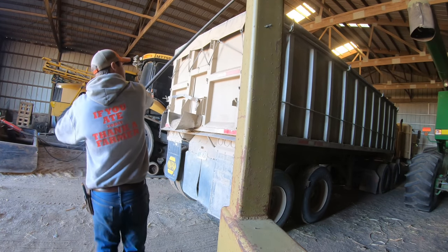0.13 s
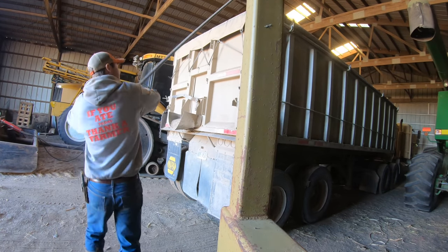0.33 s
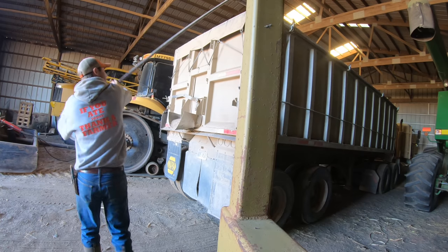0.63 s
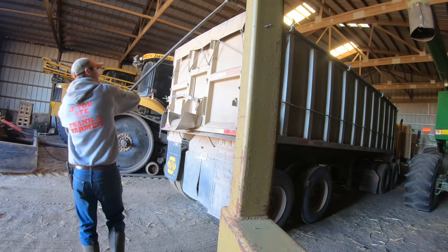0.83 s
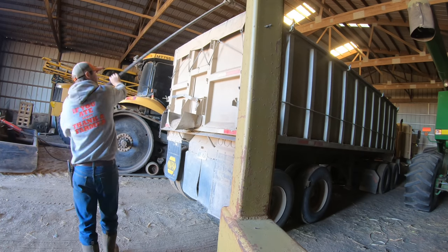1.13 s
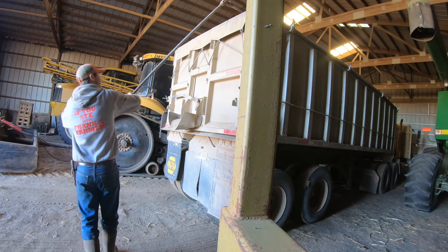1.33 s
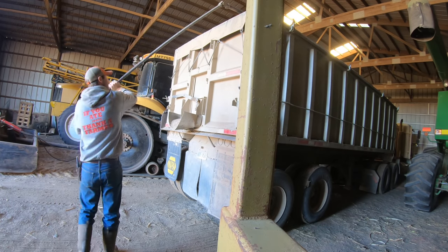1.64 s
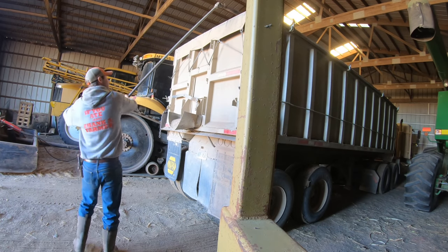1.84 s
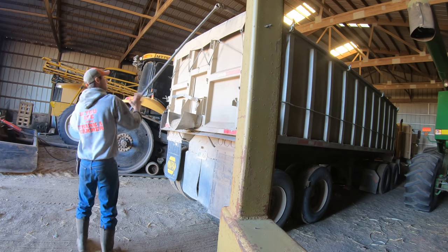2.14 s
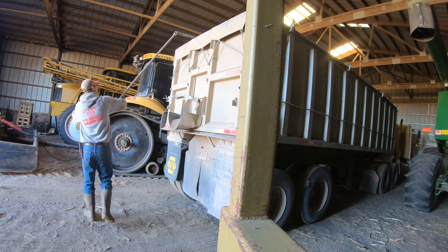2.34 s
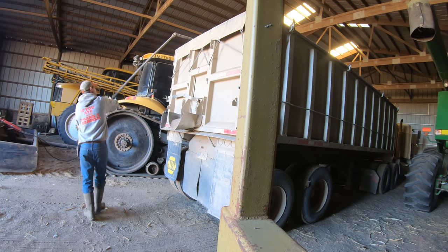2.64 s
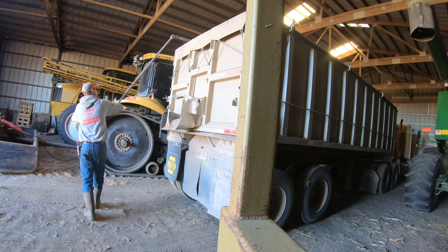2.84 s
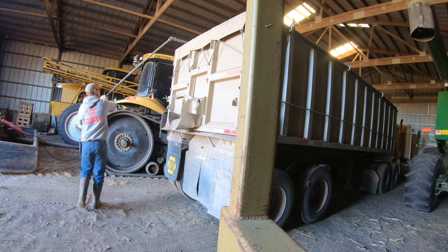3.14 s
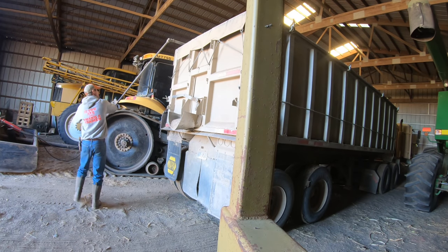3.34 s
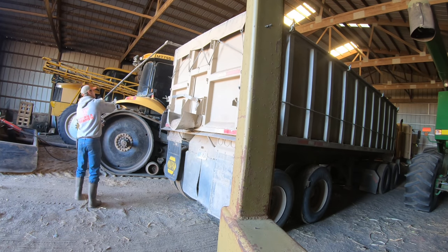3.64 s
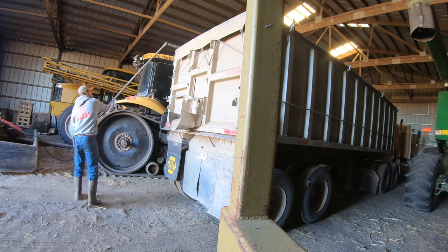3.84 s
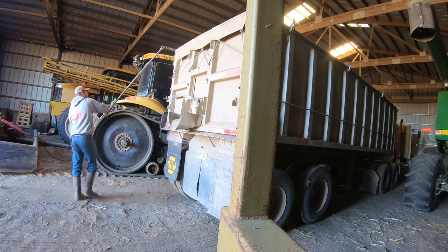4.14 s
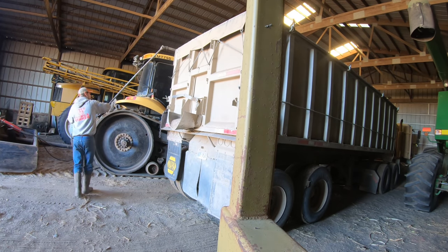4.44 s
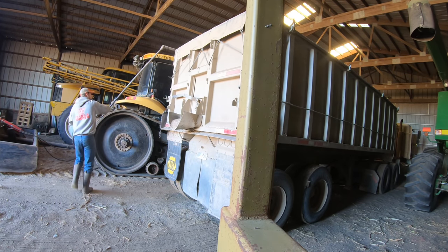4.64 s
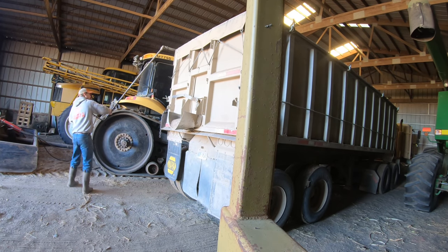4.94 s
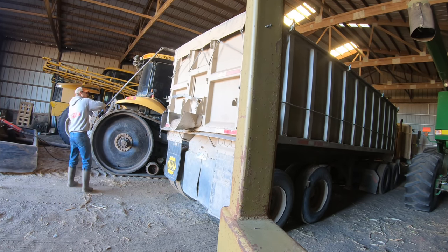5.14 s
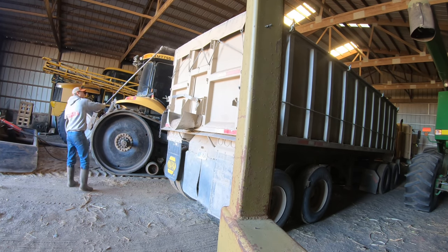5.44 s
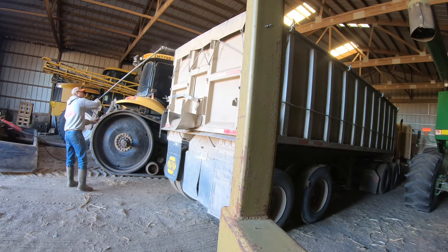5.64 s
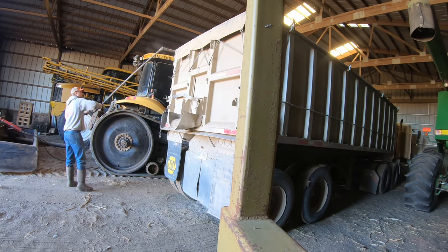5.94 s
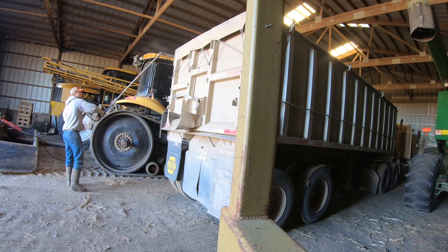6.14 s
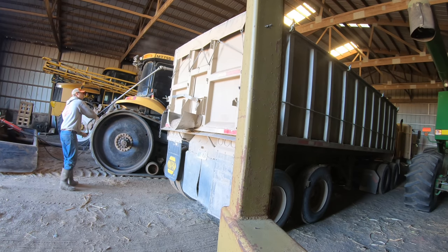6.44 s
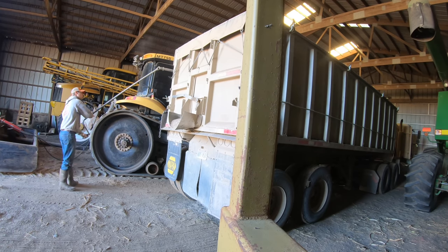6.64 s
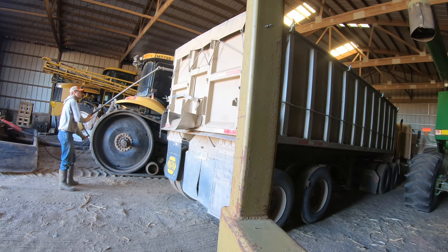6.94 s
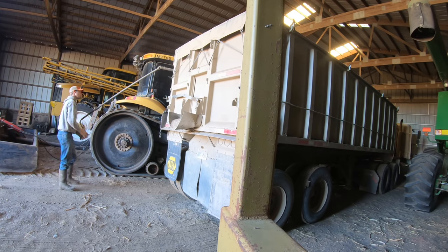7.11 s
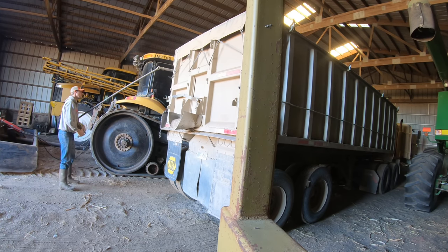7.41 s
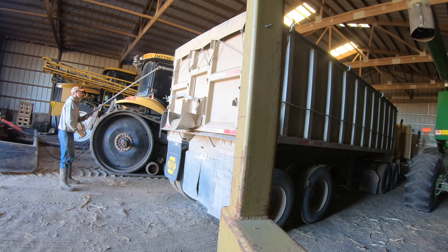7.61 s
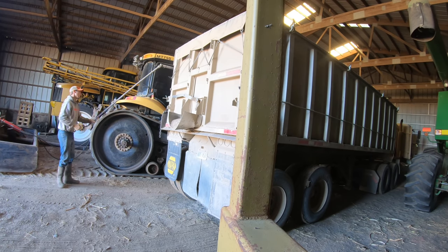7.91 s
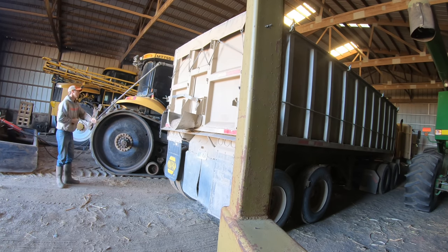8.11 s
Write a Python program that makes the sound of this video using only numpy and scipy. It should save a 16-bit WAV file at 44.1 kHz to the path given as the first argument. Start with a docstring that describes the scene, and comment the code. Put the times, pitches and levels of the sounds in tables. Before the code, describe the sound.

Inside a large farm shed, a long steel crank is worked close to the microphone. Irregular pushes bring sharp clanks, dry chattering, rasping and short thin squeaks, with the rod ringing briefly. A stiff tarp rustles farther up and bumps the hollow trailer. Knocks thin out midway, then the tarp slides over with a cluster of slaps and dull thuds, before sparse final clinks. Everything echoes for about a second.

```python
"""A long steel crank rolls a tarp over a grain trailer in a large farm shed.
Its dry joints chatter, rasp and squeak in swarms of tiny slips, and the loose rod clanks and rings in its modes.
The tarp rustles as crackling fabric, slaps and bumps the hollow trailer body, and finally slides over the edge.
The shed answers everything with about a second of decaying noise as echo; faint air lies underneath."""
import sys
import numpy as np
from scipy import signal
from scipy.fft import rfft, irfft, next_fast_len
from scipy.io import wavfile

SR = 44100
rng = np.random.default_rng(int(sys.argv[2]) if len(sys.argv) > 2 else 0)


def store_wav(level_fs):
    """Save 16-bit WAV to argv[1]."""
    pcm = np.round(np.clip(np.atleast_2d(level_fs), -1, 1) * 32767)
    wavfile.write(sys.argv[1], SR, pcm.T.astype(np.int16))


N = 364707
TIME = np.arange(N) / SR
TOP_HZ = 15100  # upper limit of the sound

# Levels in the tables are ahead of the layer trims and of the mix in scene().
# Spectrum of scraping steel. Each row: frequency in Hz, level in dB.
STEEL_SCRAPE = [(700, -19), (1200, 6), (1600, 10.5), (2300, 11.5), (3200, 12.5), (4800, 6.5), (6200, 12),
                (7500, 0), (9200, 7), (10500, -6.5), (11800, -54), (15000, -16)]
# Modes of the crank rod when slack. Each row: frequency in Hz, level in dB, t60 in seconds.
ROD_MODES = [(1670, -14, .5), (1830, -10, .3), (1915, -2, .8), (2240, -3, .75), (2400, -7, .15),
             (2830, -8, .2), (3310, -6, .6), (3470, -5, .55), (4000, -10, .25), (4600, -11, .15),
             (4893, -9, .4), (5593, -6, .32), (6020, -7, .3), (6850, -10, .2)]
# How unlike the two ears are. Each row: frequency in Hz, side gain in dB.
EAR_WIDTH = [(40, -8), (140, -17), (280, -16), (550, -5.5), (1000, 1), (2000, -3), (4000, -5.5),
             (9000, 5.5)]


def undb(db):
    """Decibels to gain."""
    return 10 ** (np.asarray(db) / 20)


def unit(x):
    """Scale to rms 1."""
    return x / np.sqrt(np.mean(x ** 2))


def along(points, hz):
    """Read (Hz, value) points on a log-frequency axis."""
    f, value = np.transpose(points)
    return np.interp(np.log(hz + 1), np.log(f), value)


def filtered(x, response):
    """Filter by a gain that is a function of frequency."""
    length = x.shape[-1]
    size = next_fast_len(length + 2048)
    hz = np.arange(size // 2 + 1) * SR / size
    return irfft(rfft(x, size) * response(hz), size)[..., :length]


def colour(x, points):
    """Filter by a (Hz, dB) spectrum."""
    return filtered(x, lambda f: undb(along(points, f)))


def resonance(f, hz, width):
    """Response of one damped resonance, 1 at its centre."""
    return 1j * f * width / (hz ** 2 - f ** 2 + 1j * f * width)


def walk(rate):
    """Random wandering line with a spread near 1, through `rate` points a second until 4096 are used."""
    knots = rng.standard_normal(4096)
    return 1.51 * np.interp(TIME * rate, np.arange(len(knots)), knots)


def clicks(rate, spread_db):
    """Tiny contacts at random times, `rate` a second; spread_db widens their range of strength."""
    size = undb(spread_db * np.minimum(rng.exponential(size=N), 4))
    return (rng.random(N) < rate / SR) * size * rng.standard_normal(N)


def add(track, s, sound):
    """Mix a sound in at time s."""
    start = max(int(s * SR), 0)
    part = sound[:max(N - start, 0)]
    track[start:start + len(part)] += part


def envelope(s, length, attack, sag, release):
    """Smooth rise around time s, a hold that sags, then a further release; both falls in dB per second."""
    age = np.maximum(TIME - s, 0)
    rise = .5 + .5 * np.tanh(2 * (TIME - s) / attack)
    return rise * undb(-sag * age - release * np.maximum(age - length, 0))


def chirps(pitch, rate, scatter, length, spread_db):
    """A swarm of tiny squeals, each a few milliseconds of slip gliding somewhere around the given pitch."""
    out = np.zeros(N)
    times = rng.uniform(0, N - 1, 9000)
    draws = rng.standard_normal((len(times), 4))
    for at, (detune, glide, size, span) in zip(times[:int(rate * N / SR)], draws):
        count = int(SR * length * np.exp(0.51 * span)) + 2
        u = np.arange(count) / count
        hz = min(pitch[int(at)] * np.exp(scatter * detune), TOP_HZ)
        tone = np.sin(2 * np.pi * hz * count / SR * (u + 0.02 * glide * u ** 2))
        swell = np.minimum(u / .15, 1) * (1 - u)
        add(out, at / SR, undb(spread_db * size) * tone * swell)
    return unit(out)


def air():
    """Faint outdoor rumble drifting in through the open door: coloured noise whose level wanders."""
    # Spectrum of the air. Each row: frequency in Hz, level in dB.
    air_spectrum = [(20, -11), (60, -78), (160, 2.5), (400, -9), (1000, -14), (3000, -11.5), (5500, -15.5),
                    (9000, -22), (12000, -63)]
    noise = unit(colour(rng.standard_normal((2, N)), air_spectrum))
    mid, side = noise * undb(-52.0 + walk(1.47))
    return mid + colour(side, EAR_WIDTH) * np.array([[1], [-1]])


def shed(x, echo_db, early_db):
    """Direct sound, quick reflections off trailer and floor, then the long echo of the roof and walls."""
    # Decay of the echo. Each row: frequency in Hz, t60 in seconds.
    echo_t60 = [(100, 0.74), (500, 1.31), (2000, 1.26), (4000, 0.73), (8000, 0.46), (14000, 0.48)]
    t = TIME[:SR]
    centres = np.geomspace(60, 15000, 9)
    noise, tail = rng.standard_normal((2, SR)), 0
    # overlapping bands of noise, each dying away at its own pace
    for hz, share in zip(centres, np.eye(len(centres))):
        band = filtered(noise, lambda f: along(np.column_stack([centres, share]), f))
        tail = tail + band * undb(-60 * t / along(echo_t60, hz))
    tail = tail * np.clip(t / 0.029, 0, 1)
    # sparse reflections
    early = rng.standard_normal((2, SR)) * (rng.random(SR) < .04) * (t > .002) * np.exp(-t / .02)
    response = (undb(echo_db) * unit(tail) + undb(early_db) * unit(early)) / np.sqrt(SR)
    source = np.atleast_2d(x).mean(axis=0, keepdims=True)
    mid, side = signal.fftconvolve(source, response, axes=1)[:, :N]
    return x + mid + colour(side, EAR_WIDTH) * np.array([[1], [-1]])


def tarp():
    """Creasing fabric crackles in uneven folds while the roll drums softly on the trailer: rolling, then tugs."""
    # Stiff fabric. Each row: frequency in Hz, level in dB.
    fabric_spectrum = [(30, -9), (120, -9.5), (330, 3), (600, -1), (1100, -2.5), (2000, -2.5), (4000, -16),
                       (8000, -34), (12000, -50)]
    # Hollow trailer body. Each row: frequency in Hz, level in dB.
    body_spectrum = [(20, -35), (55, -11), (90, -13), (140, -2.5), (230, -3.5), (330, -10.5), (600, -35),
                     (1500, -67)]
    # Tarp rolling across the top of the trailer. Each row: time in seconds, rustle level in dB.
    rolling_level = [(0.0, -41.5), (0.46, -78), (0.51, -50.5), (0.96, -59), (2.36, -53), (2.72, -44),
                     (3.2, -48), (3.57, -38.5), (3.9, -57), (4.21, -43), (4.5, -61.5)]
    # Tarp tugged along and over the edge. Each row: start in seconds, length in seconds, rustle level in dB,
    # drumming of the body in dB relative to the rustle.
    tugs = [(4.63, 0.083, -36.5, -6.5), (5.083, 0.13, -40, 6.5), (5.541, 0.036, -32.5, -2.5),
            (5.714, 0.87, -40.5, 1), (6.43, 0.26, -27.5, -1.5), (6.614, 0.16, -26, 2),
            (6.79, 0.08, -31, -1), (7.637, 0.067, -48, 12), (8.082, .11, -41.5, -22),
            (8.241, 0.054, -25.5, -25)]
    rolling_db, drum_over_rustle_db = 3.5, 3
    fade_start_s, fade_db_per_s = 5.3, 9  # the faint rolling fades away
    tug_attack_s, tug_release_db_per_s = 0.092, 69  # each tug swells, holds and dies away

    fade_db = fade_db_per_s * np.maximum(TIME - fade_start_s, 0)
    rustling = undb(rolling_db + np.interp(TIME, *np.transpose(rolling_level)) - fade_db)
    drumming = undb(drum_over_rustle_db) * rustling
    for s, length, db, drum_db in tugs:
        tug = undb(db) * envelope(s, length, tug_attack_s, 0, tug_release_db_per_s)
        rustling = np.maximum(rustling, tug)
        drumming = np.maximum(drumming, undb(drum_db) * tug)
    crackle = colour(clicks(rate=2000, spread_db=1), fabric_spectrum)
    rustle = unit(crackle * undb(1.3 * walk(40)))
    drum = unit(colour(clicks(rate=1200, spread_db=0.0), body_spectrum))
    return undb(0.5) * rustling * rustle + undb(-4.0) * drumming * drum


def slaps():
    """Heavy fabric lands flat on the trailer: a short dull smack of noise with no pitch."""
    # Folds of tarp and straps slapping. Each row: start in seconds, peak level in dB, t60 in seconds.
    slap_events = [(3.502, -27.5, 0.13), (6.514, -18, .08), (6.597, -20.5, 0.16), (6.648, -17.5, 0.11),
                   (6.663, -14.5, 0.11), (6.735, -32, 0.19), (6.837, -18.5, 0.054), (6.877, -18.5, 0.096),
                   (7.625, -35, 1), (8.226, -21, 0.39)]
    # Colour of a slap. Each row: frequency in Hz, level in dB.
    slap_spectrum = [(50, -39), (150, -7), (330, 1), (700, 0.5), (1100, -3.5), (2000, -16), (4000, -37),
                     (10000, -62)]
    attack_s = .003
    out, t = np.zeros(N), TIME[:SR // 2]
    for s, db, t60 in slap_events:
        burst = rng.standard_normal(len(t)) * undb(-60 * t / t60)
        smack = colour(burst, slap_spectrum) * np.minimum(t / attack_s, 1)
        add(out, s, undb(db) * smack / np.abs(smack).max())
    return out


def bumps(count=7):
    """Dull blows on the body: a handful of panel modes around one pitch die away together over a soft rumble."""
    # Roll tube bumping on the body. Each row: start in seconds, peak level in dB, pitch in Hz, t60 in seconds.
    bump_events = [(0.501, -23, 148, 0.13), (0.598, -13.5, 195.5, 0.082), (0.628, -19, 127.6, 0.18),
                   (0.975, -27.5, 160.4, 0.35), (1.78, -37, 104, 1), (2.307, -28.5, 182.5, 0.42),
                   (2.442, -25.5, 148.6, 0.14), (2.572, -24.5, 175, 0.077), (2.776, -28.5, 156, 0.99),
                   (3.12, -19.5, 129, 0.073), (3.273, -23, 121.8, 0.92), (3.498, -15.5, 115, 0.26),
                   (3.508, -19.5, 278.3, 1), (3.52, -34, 42, 0.37), (5.175, -29.5, 136.4, 0.6),
                   (6.641, -14, 145, 0.099), (6.66, -22, 41.6, 0.19), (6.691, -17, 104, 0.11),
                   (6.734, -24, 128.4, 0.18), (6.905, -21.5, 173, 0.074), (7.63, -36, 189.3, 1),
                   (8.225, -18, 299, 0.35)]
    attack_s = .003  # the tarp cushions the tube
    out, t = np.zeros(N), TIME[:SR // 2]
    for s, db, hz, t60 in bump_events:
        detune = np.linspace(-.45, .45, count) + 0.0632 * rng.standard_normal(count)
        mode_hz = hz * np.exp(detune)
        panels = np.sin(2 * np.pi * (mode_hz[:, None] * t + rng.random((count, 1)))).sum(axis=0)
        rumble = 13 * rng.standard_normal(len(t))
        struck = (panels + rumble) * undb(-60 * t / t60) * np.minimum(t / attack_s, 1)
        # the body resonates around the pitch and passes little far above it
        boom = filtered(struck, lambda f: resonance(f, hz, .7 * hz) ** 2 / (1 + 1j * f / (2.4 * hz)) ** 3)
        add(out, s, undb(db - 2.0) * boom / np.abs(boom).max())
    return out


def rings():
    """When the load comes off, the rod's modes sing on as clear separate tones."""
    # Slack rod left ringing after a knock. Each row: start in seconds, level in dB, pitch that rings most in Hz,
    # width of the excited range in Hz.
    ring_events = [(0.885, -17, 3330, 200), (3.07, -25, 3280, 160), (5.152, -19.5, 3460, 330),
                   (7.456, -29.5, 2080, 1300), (8.154, -20, 2220, 160)]
    out, t = np.zeros(N), TIME[:SR]
    mode_hz, mode_db, t60 = np.transpose(ROD_MODES)[:, :, None]
    for s, db, hz, width in ring_events:
        excited = np.abs(resonance(mode_hz, hz, width))
        modes = excited * undb(mode_db - 60 * t / t60) * np.sin(2 * np.pi * mode_hz * t)
        add(out, s, undb(db) * modes.sum(axis=0))
    return out


def clanks():
    """Each knock bounces at random; the contacts crack and ring the rod's modes, one pitch most at each spot."""
    # Rod knocking in its joints. Each row: start in seconds, peak level in dB, pitch that rings most in Hz,
    # time the rattling lasts in seconds, crack of the contact in dB relative to the ringing.
    knocks = [(0.026, -7.5, 2910, 0.0077, 22), (0.231, -5, 2870, 0.0076, 12), (0.399, -16, 3147, 0.034, -3),
              (0.632, -20, 1790, 0.02, 18), (0.773, -14, 3100, 0.057, 21), (0.819, -6.5, 5830, 0.024, 30),
              (1.279, -11, 3760, 0.023, 19), (1.345, -7, 4530, 0.05, 20), (1.774, -11, 6130, 0.024, 12),
              (1.963, -9.5, 2897, 0.053, 8), (2.278, -11, 2014, 0.034, 12), (2.744, -13.5, 4640, 0.029, 63),
              (3.068, -7, 3097, 0.0048, 9), (3.936, -12, 5880, 0.045, 11), (3.999, -7, 2980, 0.0085, 33),
              (4.216, -21, 4370, 0.023, 15), (4.472, -17, 3360, 0.016, 25), (4.599, -17.5, 3237, 0.093, 13),
              (4.704, -15, 3030, 0.021, 8), (4.906, -18.5, 2424, 0.019, 14), (5.036, -11, 4000, 0.014, 24),
              (5.076, -14, 2450, 0.069, 13.5), (5.148, -12.5, 3290, 0.044, -2),
              (5.486, -10, 2235, 0.055, 14), (5.591, -7.5, 6550, 0.0077, 36), (5.77, -12, 2250, 0.0042, 24),
              (6.427, -10.5, 3760, 0.084, 28), (6.466, -8.5, 4550, 0.024, 18.5),
              (6.609, -10, 3480, 0.027, 26), (6.827, -12, 6500, 0.0094, 43), (6.867, -15, 3710, 0.014, 27),
              (7.455, -19, 2255, 0.019, 11), (8.039, -20, 3317, 0.0046, 10), (8.153, -10, 2290, 0.0074, 22)]
    grip_damping = 2.6  # a rod under load dies away this many times faster than a slack one
    first_contact = 1  # strength of the first touch relative to the strongest possible bounce
    spot_db, spot_t60_s, spot_spread = 9, 0.07, .035  # close modes that ring at the struck spot
    out, t = np.zeros((2, N)), TIME[:SR // 2]
    mode_hz, mode_db, t60 = np.transpose(ROD_MODES)[:, :, None]
    for s, db, hz, length, crack_db in knocks:
        # the changing load on the rod detunes its modes a little
        load = 1 + .006 * rng.standard_normal(mode_hz.shape)
        modes = undb(mode_db - 60 * grip_damping * t / t60) * np.sin(2 * np.pi * mode_hz * load * t)
        contacts = rng.random(len(t)) < 400 / SR
        bounces = contacts * rng.uniform(-1, 1, len(t)) * np.exp(-(t / length) ** 2)
        bounces[0] = first_contact
        spot_hz = hz * (1 + spot_spread * rng.standard_normal((3, 1)))
        spot = np.sin(2 * np.pi * spot_hz * t).sum(axis=0) * undb(spot_db - 60 * t / spot_t60_s)
        for ear in out:
            crack = colour(rng.standard_normal(len(t)) * undb(-60 * t / .04), STEEL_SCRAPE)
            # each mode radiates its own way, so the two sides hear a different blend
            blend = undb(2 * rng.standard_normal(len(ROD_MODES))) @ modes
            steel = (blend + spot + undb(crack_db) * crack) * np.minimum(t / .003, 1)
            rattle = signal.fftconvolve(bounces, steel)[:len(t)]
            knock = filtered(rattle, lambda f: resonance(f, hz, 0.9 * hz))
            add(ear, s, undb(db - 2.0) * knock / np.abs(knock).max())
    return out


def squeaks(waver=.012, flutter_db=2.5):
    """Short gliding stick-slip tones with overtones; pitch and strength tremble as the grip changes."""
    # Dry joint sticking and slipping. Each row: start in seconds, length in seconds, start pitch in Hz,
    # end pitch in Hz, level in dB.
    glides = [(0.098, 0.032, 3850, 3600, -25), (0.113, 0.056, 1764, 1864, -21),
              (0.117, 0.051, 5300, 5580, -28), (0.168, 0.027, 4020, 4060, -23),
              (0.214, 0.02, 4680, 4470, -34), (0.216, 0.078, 1900, 1980, -33), (.243, .03, 2930, 2900, -34),
              (.255, .05, 5460, 5540, -34), (.328, 0.026, 2830, 2900, -26.5), (.33, 0.043, 1990, 1916, -30),
              (.37, 0.013, 5980, 5840, -22), (0.449, 0.043, 1890, 1906, -26),
              (0.404, 0.04, 3200, 3280, -20), (0.467, 0.042, 3300, 3330, -24),
              (0.638, 0.014, 2084, 1838, -23), (0.663, 0.023, 3426, 3734, -13.5),
              (0.689, 0.029, 3910, 4040, -19.5), (0.715, 0.017, 4400, 4540, -27),
              (0.731, 0.049, 1810, 1984, -22.5), (.735, 0.043, 3650, 4030, -22),
              (.73, 0.064, 5750, 5970, -25.5), (0.9, 0.07, 11300, 10850, -50),
              (0.976, 0.041, 1920, 1870, -24), (1.203, 0.017, 4660, 3880, -26.5),
              (1.219, 0.019, 3460, 3520, -15), (1.236, 0.041, 3520, 3720, -23),
              (1.231, 0.048, 7050, 7400, -29.5), (1.297, 0.03, 1847, 1915, -21.5),
              (1.425, 0.025, 1912, 2034, -18), (1.703, 0.066, 1750, 1622, -29),
              (1.769, .012, 4070, 3900, -24.5), (1.781, 0.013, 3520, 3380, -20.5),
              (1.801, 0.027, 3460, 3390, -17), (1.809, 0.032, 5710, 5790, -25.5),
              (1.826, 0.033, 3570, 3980, -24), (1.803, 0.075, 1910, 2010, -26.5),
              (2.267, 0.064, 1977, 1812, -22), (2.266, .018, 3780, 3820, -24.5),
              (2.335, 0.04, 6700, 7500, -34), (2.763, 0.017, 3370, 3336, -13),
              (2.785, 0.1, 1872, 1820, -25), (3.285, 0.12, 1750, 1864, -24.5),
              (3.385, 0.22, 1915, 1847, -24), (3.838, 0.023, 1750, 1704, -26.5),
              (4.01, 0.031, 1968, 1930, -17), (4.57, 0.018, 2315, 2430, -23), (4.92, 0.03, 4890, 4920, -36),
              (5.029, 0.0213, 2242, 2630, -16), (5.069, 0.052, 2580, 1916, -24),
              (5.152, 0.086, 3415, 3590, -32.5), (6.135, 0.087, 1933, 2136, -25.5),
              (7.62, 0.034, 6060, 6060, -45), (8.151, 0.0266, 2337, 2200, -26.5)]
    overtone_db = [2.0, -8.0, -10.5, -28.0]  # from the fundamental up
    out = np.zeros(N)
    tremble = 1 + waver * walk(600)
    grip = undb(flutter_db * walk(220))
    for s, length, start_hz, end_hz, db in glides:
        span = slice(int(s * SR), int((s + length) * SR))
        u = np.linspace(0, 1, len(TIME[span]))
        hz = (start_hz + (end_hz - start_hz) * u) * tremble[span]
        phase = 2 * np.pi * np.cumsum(hz) / SR
        tone = 0
        for k, over_db in enumerate(overtone_db, 1):
            if k * start_hz < TOP_HZ:
                # the scraping spectrum sets how strongly the steel radiates each overtone
                radiated_db = along(STEEL_SCRAPE, k * start_hz) - along(STEEL_SCRAPE, start_hz)
                tone = tone + undb(over_db + radiated_db) * np.sin(k * phase)
        swell = np.clip(u / 0.028, 0, 1) * np.clip((1 - u) / 0.18, 0, 1)
        add(out, s, undb(db) * tone * swell * grip[span])
    return out


def rasps():
    """Under full load the joint sticks and slips in a buzzing train; each slip ticks and rings a shifting pitch."""
    # Joint grinding under full load. Each row: start in seconds, length in seconds, level in dB,
    # start pitch in Hz, end pitch in Hz.
    grinds = [(0.225, 0.036, -21.5, 2760, 3250), (0.397, 0.032, -22, 3230, 3300),
              (0.775, 0.1, -23.5, 3130, 3470), (1.276, 0.049, -24, 3630, 3580),
              (1.348, 0.1, -23.5, 3700, 3300), (1.851, 0.074, -22, 3540, 3340),
              (1.912, 0.15, -27.5, 3100, 2960), (2.284, 0.064, -19, 3190, 3360),
              (2.344, 0.097, -23, 3490, 3260), (3.927, 0.14, -26.5, 2690, 3290),
              (5.141, 0.022, -27, 3100, 3240), (6.106, 0.12, -26.5, 2200, 2410)]
    # What each slip rings. Each row: multiple of the grinding pitch, level in dB.
    slip_modes = [(.57, -18), (1.001, 5.5), (1.16, -2), (1.76, -20.5), (2.1, -8)]
    slip_rate_hz, slip_jitter, pitch_scatter = 310, .22, .045
    slip_t60_s, tick_db = .015, -2
    out, t = np.zeros(N), TIME[:SR // 80]
    ratio, mode_db = np.transpose(slip_modes)[:, :, None]
    for s, length, db, start_hz, end_hz in grinds:
        train = np.zeros(N)
        # one row of chance per slip: timing, strength, then the detuning of each mode
        chance = rng.standard_normal((80, 2 + len(ratio)))
        scrape = unit(colour(rng.standard_normal((len(chance), len(t))), STEEL_SCRAPE))
        ticks = scrape * undb(tick_db - 60 * t / .008)
        ages = np.cumsum(np.exp(slip_jitter * chance[:, 0])) / slip_rate_hz
        for age, draw, tick in zip(ages[ages < length], chance, ticks):
            # the pitch shifts as the crank turns
            pitch = start_hz + (end_hz - start_hz) * age / length
            hz = pitch * ratio * (1 + pitch_scatter * draw[2:, None])
            ring = (np.sin(2 * np.pi * hz * t) * undb(mode_db - 60 * t / slip_t60_s)).sum(axis=0)
            add(train, s + age, undb(2 * draw[1]) * (ring + tick) * np.minimum(t / .0003, 1))
        out += undb(db) * train / np.sqrt(np.sum(train ** 2) / (length * SR))
    return out


def cranking():
    """Strength of chatter, rod ringing and scraping, and the chatter's pitch, as one push follows another."""
    # Pushes on the crank. Each row: start in seconds, length in seconds, joint chatter in dB,
    # ringing of the rod in dB, gritty scraping in dB, chatter pitch at the start in Hz.
    strokes = [(.005, 0.004, -26, -27.5, -32, 2970), (0.096, 0.079, -33, -27, -31, 3390),
               (0.227, 0.21, -26.5, -28.5, -28, 3390), (0.63, 0.21, -29, -33, -35, 3830),
               (0.792, 0.2, -22, -32.5, -30.5, 3496), (1.208, 0.15, -24, -34.5, -30.5, 3750),
               (1.285, 0.22, -26, -29, -33, 3513), (1.57, 0.3, -33, -35, -43, 3430),
               (1.819, 0.19, -21, -38, -26.5, 3472), (2.277, 0.1, -28, -29.5, -26, 3550),
               (2.773, 0.12, -31.5, -30, -31, 3075), (3.054, 0.018, -30.5, -28.5, -30.5, 3436),
               (3.219, 0.16, -27, -28, -29, 3370), (3.33, 0.067, -41, -26.5, -20.5, 3430),
               (3.501, 0.56, -35.5, -43, -40.5, 3577), (3.789, 0.22, -27.5, -28, -34, 3180),
               (3.918, 0.18, -30, -28, -28.5, 3075), (4.581, 0.15, -31, -30.5, -36, 3160),
               (4.695, 0.016, -27, -34, -25, 3040), (5.06, 0.08, -32, -25, -50, 2610),
               (5.147, 0.013, -39, -38, -28.5, 3540), (5.488, 0.087, -33, -38, -38, 2490),
               (5.555, 0.045, -30, -42, -31, 2576), (5.768, 0.02, -34, -27, -41, 2830),
               (5.985, 0.041, -23.5, -25, -25.5, 2950), (6.013, 0.1, -29, -25.5, -28, 2760),
               (6.13, 0.091, -48, -40, -31.5, 2300), (6.425, 0.028, -32, -32, -30.5, 3120),
               (6.614, 0.13, -34.5, -56, -30.5, 3170), (7.11, 0.079, -74, -52, -48.5, 3500),
               (8.05, 0.5, -42, -56, -47.5, 2480)]
    attack_s, sag_db_per_s = 0.045, 13  # the joint breaks loose, then eases while the hand keeps pushing
    # after a push the rod rings on longest (dB per second, on top of the sag)
    chatter_release, ring_release, grit_release = 121, 96, 156
    pitch_sag_hz_per_s, pitch_sag_limit_hz = 1216, 356  # the chatter sinks through each push
    effort, ringing, scraping, pitch = np.zeros((4, N))
    for s, length, chatter_db, ring_db, grit_db, hz in strokes:
        push = lambda release: envelope(s, length, attack_s, sag_db_per_s, release)
        effort = np.maximum(effort, undb(chatter_db) * push(chatter_release))
        ringing = np.maximum(ringing, undb(ring_db) * push(ring_release))
        scraping = np.maximum(scraping, undb(grit_db) * push(grit_release))
        sunk_hz = hz - np.minimum(pitch_sag_hz_per_s * (TIME - s), pitch_sag_limit_hz)
        pitch = np.where(TIME >= s, sunk_hz, pitch)
    return effort, ringing, scraping, pitch


def chatter():
    """On each push dry steel slips in quick uneven jerks that chirp, ring the joint and the rod, and scrape."""
    # Resonances of the chattering joint. Each row: frequency in Hz, width in Hz ahead of the narrowing below,
    # level in dB.
    joint_modes = [(2940, 87, -10), (3224, 460, -6.5), (3840, 250, -11), (5444, 160, 0), (5697, 370, -4.5),
                   (7340, 760, -9.5)]
    narrowing = 0.48
    effort, ringing, scraping, pitch = cranking()
    jerks = undb(2.8 * np.tanh(walk(70)))
    slips = clicks(rate=1500, spread_db=-2.0)
    joint = filtered(slips, lambda f: sum(undb(db) * resonance(f, hz, narrowing * width) ** 2
                                          for hz, width, db in joint_modes))
    rod_hum = unit(filtered(slips, lambda f: resonance(f, 1900, 150) ** 2))
    rod_chirps = chirps(1910 * (1 + .02 * walk(14)), rate=190, scatter=.022, length=.024, spread_db=.5)
    ring = .7 * rod_hum + rod_chirps
    ring = ring * undb(2.5 * np.tanh(walk(16)))  # the rod's ring comes and goes with the load
    # a higher, narrow mode of the rod gathers the slips and sings on between pushes
    singing = filtered(effort * jerks * unit(slips), lambda f: resonance(f, 3330, 70))
    low = chirps(pitch, rate=190, scatter=.05, length=.012, spread_db=2)
    # the joint's next bending mode chirps along more quietly
    high = chirps(1.76 * pitch, rate=90, scatter=.06, length=.014, spread_db=2.5)
    grains = chirps(np.full(N, 4600), rate=520, scatter=.38, length=.008, spread_db=2.2)
    grit = colour(.58 * unit(clicks(rate=1900, spread_db=1)) + .72 * grains, STEEL_SCRAPE)

    squeal = undb(-9) * unit(joint) + undb(-4.5) * low + undb(-9.5) * high
    driven = undb(-1.5) * effort * squeal
    rod = undb(-1.5) * ringing * unit(ring)
    scrape = undb(2.0) * scraping * unit(grit)
    return undb(17) * singing + jerks * (driven + rod + scrape)


def scene():
    """Crank close by, tarp farther up on the trailer, both inside the shed."""
    crank = shed(chatter() + rasps() + clanks() + rings() + squeaks(), echo_db=-6.0, early_db=-5.5)
    cover = shed(tarp() + slaps() + bumps(), echo_db=-7.5, early_db=-5.5)
    return undb(-3.5) * crank + undb(-2.0) * cover + air()


def record(dry):
    """The two microphone ports colour the sound differently; the top is cut."""
    # Lean of the microphone. Each row: frequency in Hz, left minus right in dB.
    port_lean = [(150, 0.5), (500, -1.5), (1000, -1), (2000, -1), (3300, 1), (5000, -8), (7500, -0.5),
                 (12000, 4)]
    ports = [filtered(x, lambda f: undb(sign * along(port_lean, f) / 2)) for x, sign in zip(dry, (1, -1))]
    top_cut = signal.ellip(8, .2, 70, TOP_HZ, fs=SR, output="sos")
    return signal.sosfilt(top_cut, ports)


dry = scene()
out = record(dry)
store_wav(out)
```